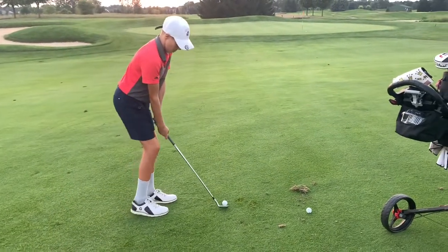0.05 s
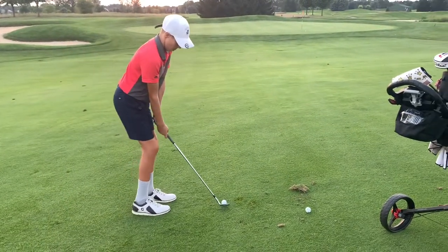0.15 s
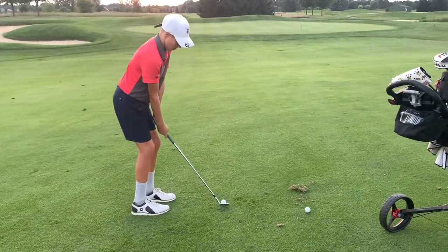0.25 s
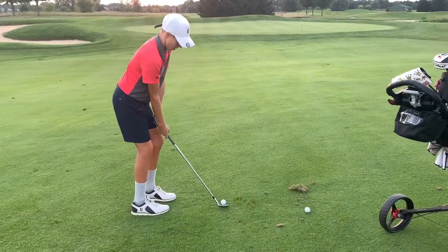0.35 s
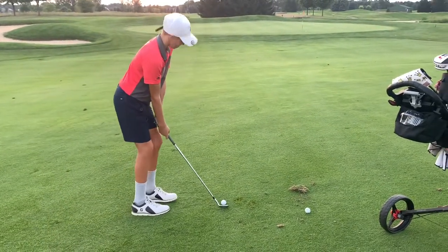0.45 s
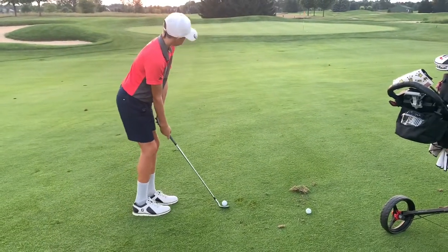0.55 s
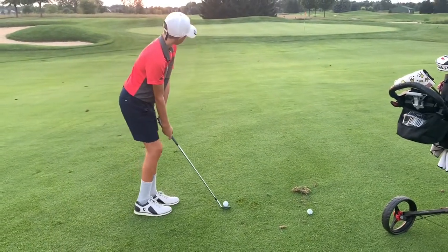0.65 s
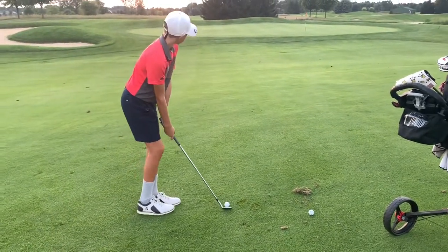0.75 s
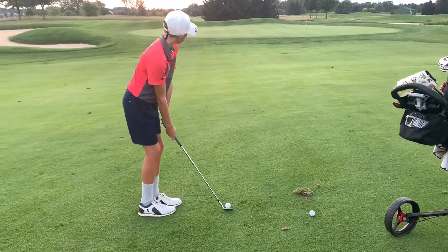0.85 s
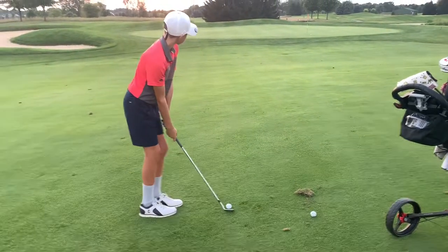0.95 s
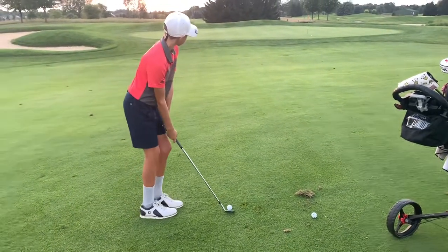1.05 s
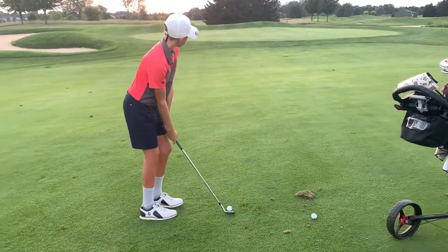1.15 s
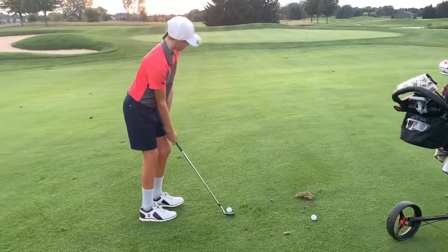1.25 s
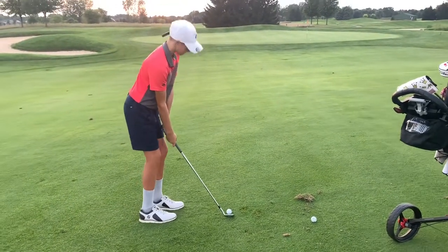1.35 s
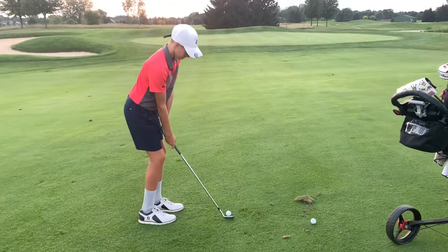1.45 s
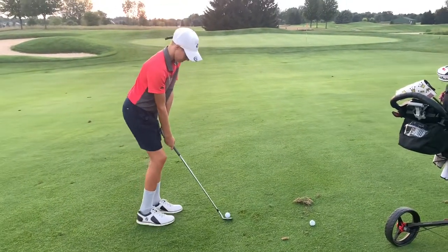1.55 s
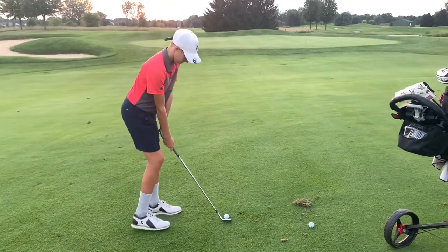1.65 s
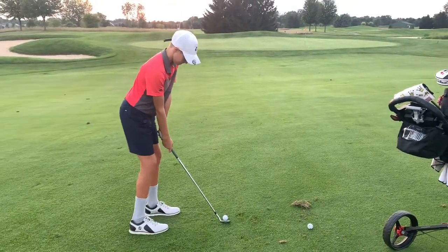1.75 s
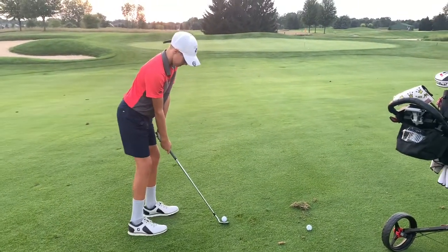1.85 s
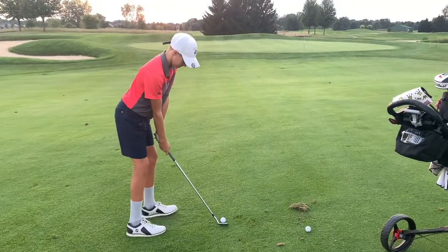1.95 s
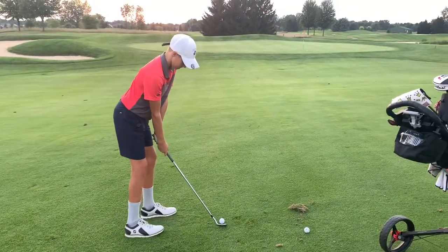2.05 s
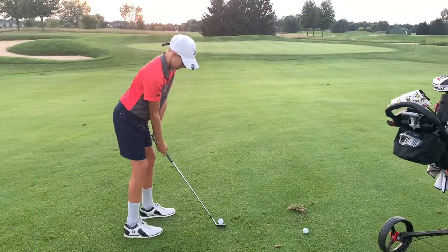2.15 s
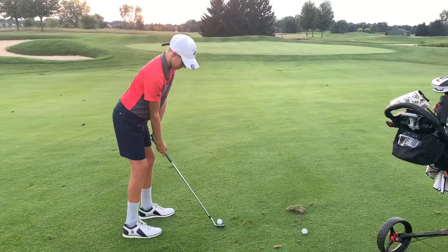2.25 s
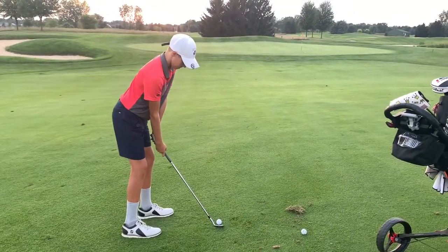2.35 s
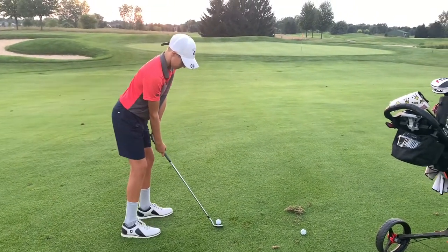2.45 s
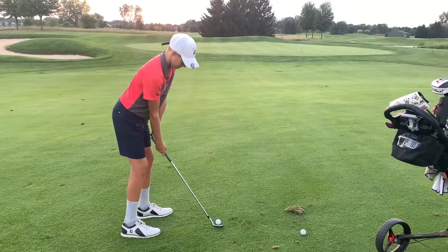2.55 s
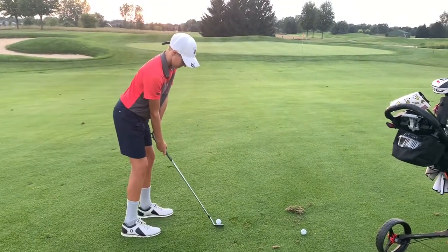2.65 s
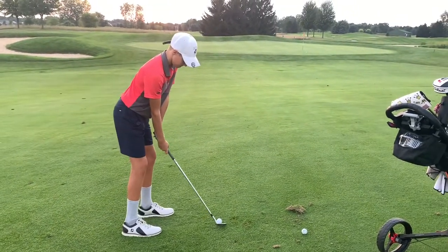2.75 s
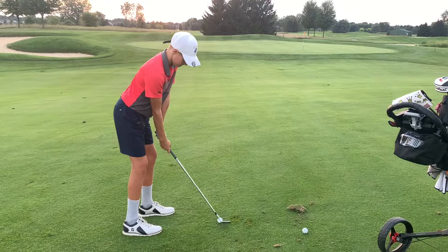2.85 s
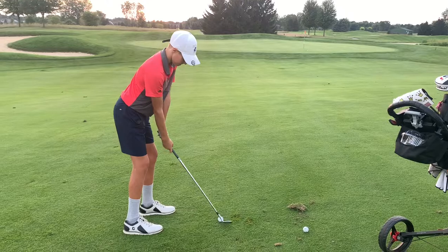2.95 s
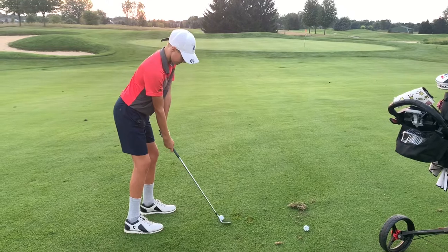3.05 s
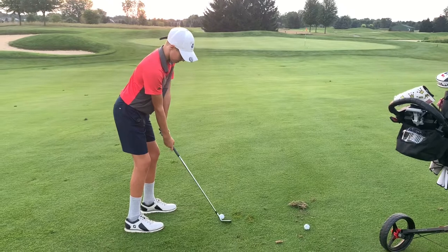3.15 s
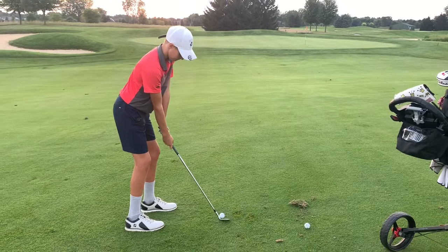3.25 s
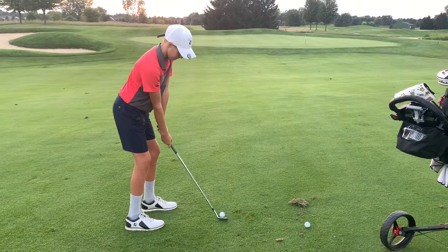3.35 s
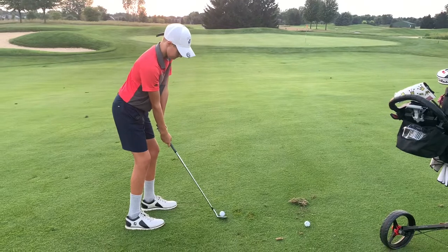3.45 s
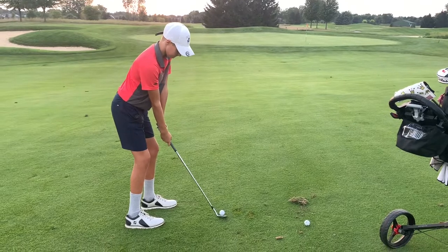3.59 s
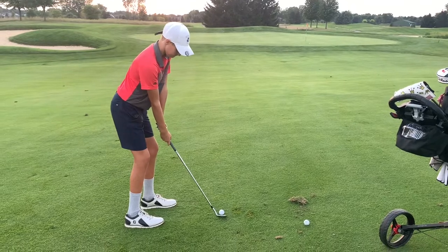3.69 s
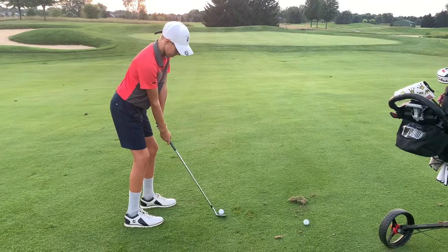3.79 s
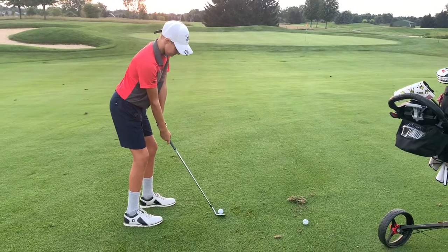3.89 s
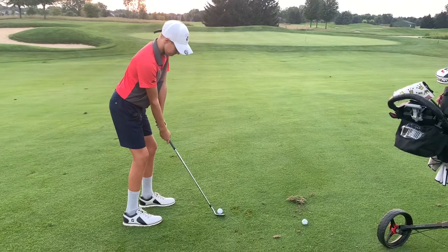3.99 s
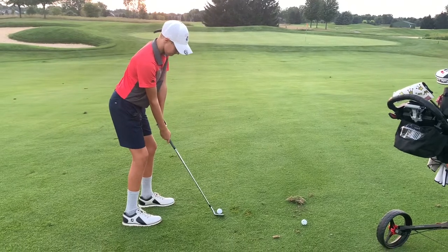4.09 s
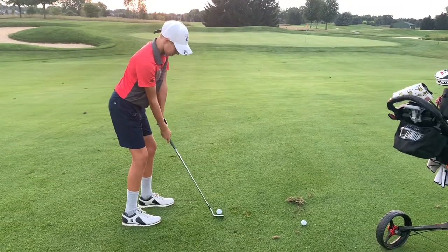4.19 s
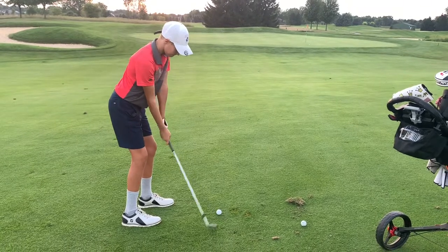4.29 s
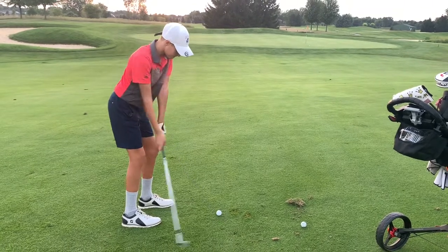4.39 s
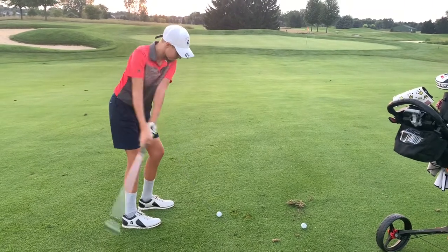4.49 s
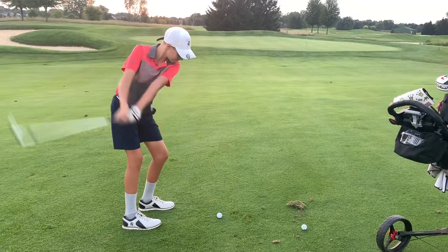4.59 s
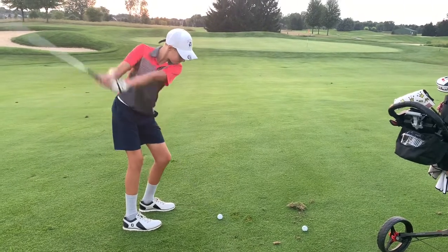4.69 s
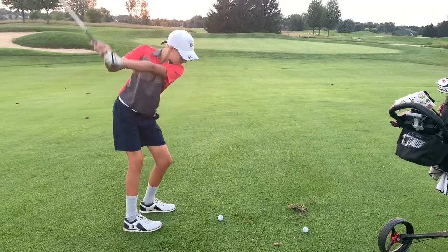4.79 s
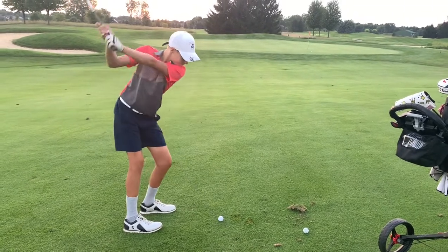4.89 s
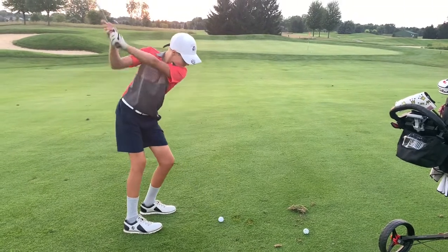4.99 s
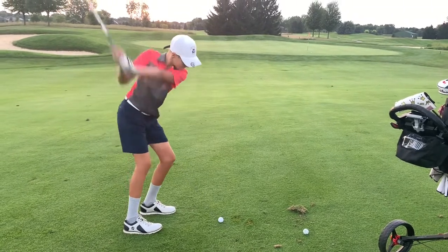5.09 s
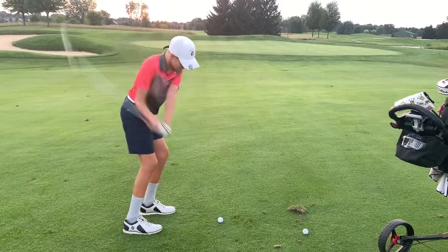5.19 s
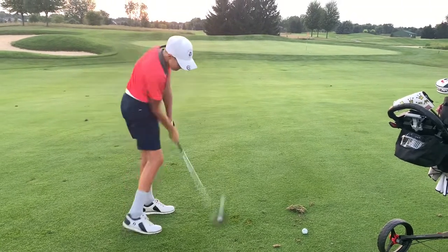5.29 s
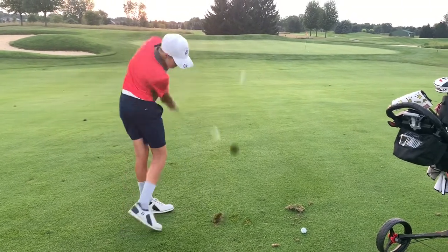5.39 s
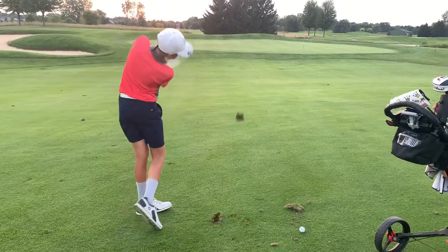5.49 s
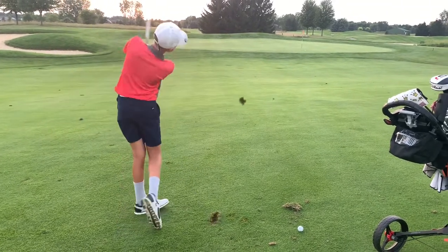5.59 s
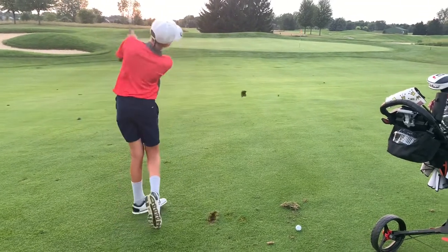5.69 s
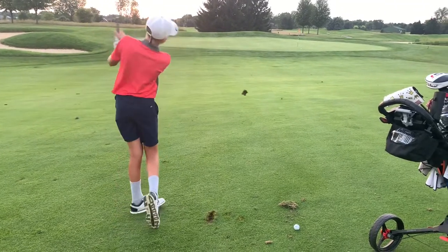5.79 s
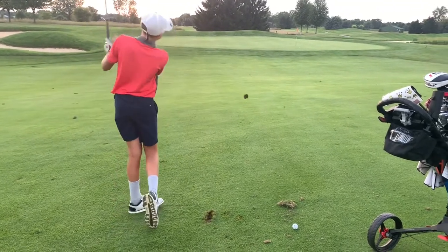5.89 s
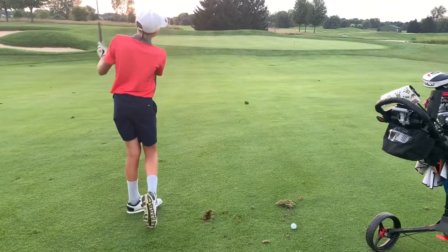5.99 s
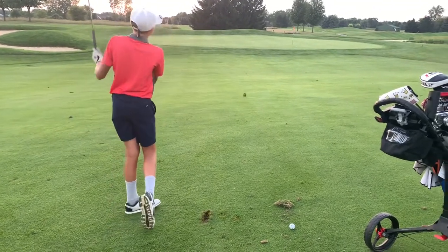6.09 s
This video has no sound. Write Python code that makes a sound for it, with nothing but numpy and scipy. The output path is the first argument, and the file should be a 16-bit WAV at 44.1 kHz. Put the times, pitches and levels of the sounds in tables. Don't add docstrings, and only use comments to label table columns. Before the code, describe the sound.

Outdoors on a wide lawn, a hand-held microphone a few steps away picks up soft rumble, distant road wash, a slow engine throb and steady high insects. Cloth rubs and little gear ticks come early, with a clear rising bird whistle at about one second and another later. After a quiet wait, an iron smacks the ball with a short crack, torn turf and thud, followed by a soft whoosh and close clicks.

```python
import sys
import numpy as np
from scipy import signal
from scipy.fft import rfft, irfft
from scipy.io import wavfile
from scipy.ndimage import uniform_filter1d

SR = 44100
rng = np.random.default_rng(int(sys.argv[2]) if len(sys.argv) > 2 else 0)


def rack_gain(trim_db):
    fader = np.asarray(trim_db, float)
    return 10 ** (fader / 20)


def inscribe(sig):
    pcm = np.round(np.clip(np.atleast_2d(sig).T, -1, 1) * 32767)
    wavfile.write(sys.argv[1], SR, pcm.astype(np.int16))


N = 270405
T, HZ = np.arange(N) / SR, np.fft.rfftfreq(N, 1 / SR)
EDGE_DB = 30


def evened(x):
    return x / np.sqrt(np.mean(x ** 2) + 1e-20)


def read(points, hz):
    f, value = np.transpose(points)
    return np.interp(np.log(hz + 1), np.log(f + 1), value)


def curve(rows, column=1):
    rows = np.array(rows)
    return np.interp(T, rows[:, 0], rows[:, column])


def drift(rate_hz, count=1):
    z = rfft(rng.standard_normal((count, N))) / (1 + (HZ / rate_hz) ** 2)
    return evened(irfft(z * (HZ > 0), N))


def noise(points, lo_hz=20, hi_hz=16000):
    z = rfft(rng.standard_normal((2, N))) * rack_gain(read(points, HZ))
    in_band = irfft(z * (HZ > lo_hz) * (HZ < hi_hz), N)
    return irfft(z, N) / np.std(in_band)


def resonate(x, hz, width):
    turn = np.exp(2j * np.pi * np.cumsum(hz * np.ones(x.shape[-1])) / SR)
    r = np.exp(-np.pi * width / SR)
    smooth = signal.lfilter([(1 - r) ** 2], [1, -2 * r, r * r], x / turn)
    return 2 * (turn * smooth).real


def strokes(rows):
    out = np.zeros(N)
    for s, db, rise, hold, fall in rows:
        before, after = (s - T) / rise, (T - s - hold) / fall
        below = np.maximum(np.maximum(before, after), 0)
        out += rack_gain(db - EDGE_DB * below) * (below < 1.5)
    return out


def patchy(x, db, bins, frames):
    z = signal.stft(x, nperseg=1024)[2]
    field = uniform_filter1d(rng.standard_normal(z.shape[1:]), size=bins, axis=0)
    field = uniform_filter1d(field, size=frames, axis=1)
    return signal.istft(z * rack_gain(db * evened(field)), nperseg=1024)[1][:, :N]


# pitch in Hz, left over right in dB.
LEAN = [(60, 2.0), (110, 1), (200, 1.5), (380, 0), (700, 6), (1290, 1.5), (2380, -1), (4400, -2.5),
        (8120, 0), (15000, 0)]


def ports(x, late_ms, same=1):
    a, b = rfft(x * np.ones((2, 1)))
    same = np.clip(same, 0, 1)
    late = -HZ * late_ms / 1000 * np.clip((HZ - 350) / 500, 0, 1)
    early = (HZ - 6200) / 4750 - round(6 * late_ms)
    treble = np.clip((HZ - 5600) / 600, 0, 1)
    phase = (1 - treble) * late + treble * early
    right = (same * a + np.sqrt(1 - same ** 2) * b) * np.exp(2j * np.pi * phase)
    lean = rack_gain(read(LEAN, HZ) / 2)
    return irfft(np.array([a * lean, right / lean]), N)


# pitch in Hz, level in dB per Hz.
AIR = [(30, -8), (70, 1.5), (130, -9), (250, -15), (500, -22), (850, -21), (1300, -32), (1700, -32.5),
       (2500, -51), (3600, -56.5), (6500, -50.5), (9000, -55.5), (13000, -54), (16000, -65)]
# time in seconds, level in dB.
ROAD = [(0.0, -66.5), (1.06, -72.5), (1.93, -60), (2.9, -62), (4.66, -56), (5.48, -58), (6.13, -62)]
# pitch in Hz, width in Hz, level in dB.
TYRES = [
    (909, 357, -2),
    (1700, 170, -19),
    (2380, 860, -22),
]
# pitch in Hz, likeness from 0 to 1.
AIR_SAME = [(60, 0.97), (200, 0.72), (600, 0.4), (3000, 0.16), (6000, 0.59), (8000, 0.47), (16000, 1)]


def air():
    wash = rack_gain(-52 + 0.33 * drift(8.4)) * noise(AIR)
    tyres = 0
    for hz, width, db in TYRES:
        tyres = tyres + rack_gain(db) * evened(resonate(rng.standard_normal((2, N)), hz, width))
    road = rack_gain(curve(ROAD) - 2 + 0.79 * drift(5.9)) * tyres
    return ports(patchy(wash + road, 2.03, bins=5, frames=5), 0.36, read(AIR_SAME, HZ))


# pitch in Hz, width in Hz, level in dB.
WINGS = [
    (4517, 170, -2.5),
    (4880, 520, 1),
    (5243, 300, -4),
]


def insects():
    chorus = 0
    for hz, width, db in WINGS:
        clicks = rng.standard_normal((2, N)) * rack_gain(1.245 * drift(13) + 0.69 * drift(150))
        chorus = chorus + rack_gain(db) * resonate(clicks, hz, width)
    sway_db = 0.6 * np.cos(2 * np.pi * (T - .4) / 1.6)
    chorus = rack_gain(-74.5 + sway_db + 6.5) * evened(chorus)
    return ports(patchy(chorus, 1.2, bins=3, frames=4), 0.505, 0.54)


# time in seconds, level in dB, brightness in dB per order.
ENGINE = [(0.0, -52, 5), (0.94, -50, -3.5), (2.39, -48.5, -2.5), (2.7, -52, -14), (3.69, -56.5, -8),
          (4.0, -56, -14), (4.47, -55.5, 1), (4.9, -54, -0.5), (5.45, -51.5, 3), (5.79, -55, 2),
          (6.13, -52, 5)]
# order, dB over the level, share of brightness.
STRONG_ORDERS = [(3, -0.5, -0.24), (4, 1.5, 0.063), (5, -5.5, 1.75)]
# order, level in dB.
WEAK_ORDERS = [(2, -81), (6, -81), (7, -69.5)]
FIRING_HZ, FIRST_FIRING_S = 19.74, 0.0019


def engine():
    turns = 2 * np.pi * FIRING_HZ * (T - FIRST_FIRING_S)
    level, brightness = curve(ENGINE), curve(ENGINE, column=2)
    levels = [(order, level + db + share * brightness) for order, db, share in STRONG_ORDERS]
    levels = levels + list(WEAK_ORDERS)
    wander = drift(0.5, count=2 * len(levels))
    out = np.zeros(N)
    for i, (order, db) in enumerate(levels):
        gain = np.sqrt(2) * rack_gain(db + 0.41 * wander[2 * i])
        out += gain * np.cos(order * turns + 0.084 * wander[2 * i + 1])
    return ports(out, 0.018)


def whistle(row, swell_db, scoop, flick, scoop_share, bounce, droop_hz=130, stop_s=.018,
            hook_s=0, hook_top=1.0246, hook_db=0, skirt_db=-24, bend=1):
    start, length, low_hz, end_hz, db = row
    t = np.arange(0, length + stop_s, 1 / SR)
    u = np.clip((t - hook_s) / (length - hook_s), 0, 1)
    h = np.minimum(t / (hook_s + 1e-9), 1)
    stop = np.maximum(t - length, 0) / stop_s
    x = u / scoop_share
    sprung = 1 - np.exp(-x) * (np.cos(bounce * x) + np.sin(bounce * x) / bounce)
    flicked = flick / (1 + np.exp((.89 - u) / .035))
    climb = scoop * sprung + flicked + (1 - scoop - flick) * u ** bend
    crest = .36
    rising = h < crest
    side = np.where(rising, 1 - h / crest, (h - crest) / (1 - crest))
    top_hz = hook_top * end_hz
    foot_hz = np.where(rising, .92 * top_hz, low_hz)
    hook_hz = top_hz + (foot_hz - top_hz) * np.sin(side * np.pi / 2) ** 2
    glide_hz = low_hz + (end_hz - low_hz) * climb - droop_hz * stop
    hz = np.where(h < 1, hook_hz, glide_hz)
    glide = rack_gain(db - swell_db * (1 - climb) - EDGE_DB * stop ** 3)
    hook = (h < 1) * rack_gain(db + hook_db + skirt_db * side ** 2)
    gain = np.maximum(glide * h ** 2, hook) * np.minimum(t / 0.0048, 1)
    return round(start * SR), gain * np.sin(2 * np.pi * np.cumsum(uniform_filter1d(hz, size=200)) / SR)


def bird(calls, flutter_db, echo_db):
    song = np.zeros(N)
    for at, call in calls:
        song[at:at + len(call)] += call
    song = np.sqrt(2) * song * rack_gain(flutter_db * drift(34)[0])
    tail = rng.standard_normal(8000) * rack_gain(-60 * T[:8000] / 0.39)
    return song + rack_gain(echo_db) * signal.oaconvolve(song, tail / np.linalg.norm(tail))[:N]


# start in seconds, length in seconds, lowest Hz, end Hz, end level in dB.
NEAR_BIRD = [
    (0.999, .442, 4030, 4560, -48.5),
    (3.598, .462, 4090, 4570, -49.5),
]
CLEAR_BIRD = [(4.62, .42, 4110, 4660, -63)]
LATE_BIRD = [(5.405, .47, 4130, 4720, -70.5)]
LEVEL_BIRD = [(1.866, .311, 3850, 4130, -68)]
FAR_GLIDES = [(.52, .16, 4350, 4420, -74), (4.09, .09, 4280, 4520, -68), (5.9, .07, 4580, 4750, -71)]
THIRD_BIRD = [(1.975, .63, 4080, 4630, -73)]
FOURTH_BIRD = [(2.36, .325, 4220, 4700, -73.5)]
HIGH_BIRD = [
    (1.975, 0.01, 7000, 6890, -74.5),
    (5.4, 0.015, 7400, 7200, -76),
    (5.68, .2, 6470, 6950, -80.5),
]


def birds():
    near = [whistle(row, 27, .27, .2, .06, .3, droop_hz=170, hook_s=.039, hook_db=1.5, skirt_db=-19)
            for row in NEAR_BIRD]
    clear = [whistle(row, 11, .24, .08, .24, 3.2, hook_s=.045, hook_top=.98, hook_db=-8, skirt_db=-12, bend=2.4)
             for row in CLEAR_BIRD]
    far = [whistle(row, 14, .3, .3, .3, 1.8, hook_s=.045, hook_top=1.02, hook_db=2, skirt_db=-12)
           for row in LATE_BIRD]
    far += [whistle(row, 5, .66, .3, .36, 2.4, droop_hz=200, stop_s=.06,
                    hook_s=.06, hook_top=1.13, hook_db=-4, skirt_db=-5) for row in LEVEL_BIRD]
    far += [whistle(row, 6.0, 0.38, 0.11, 0.16, 2.8) for row in FAR_GLIDES]
    third = [whistle(row, 9, .45, .03, .09, .6, hook_s=.042, hook_top=1.005, hook_db=-9, skirt_db=-1)
             for row in THIRD_BIRD]
    third += [whistle(row, 5, .14, .72, .1, 1.2) for row in FOURTH_BIRD]
    high = [whistle(row, 13.2, .1, .3, .1, 0.47) for row in HIGH_BIRD]
    song = bird(near, 0.5, -24) + bird(far, 2.6, -7) + bird(third, 3, -2.5) + bird(high + clear, 1.8, -15)
    return ports(song, 0.47)


def rustle(rows, points, lo_hz, hi_hz, grain_db):
    return strokes(rows) * rack_gain(grain_db * drift(62)) * noise(points, lo_hz, hi_hz)


# full from in seconds, level in dB,
# then rise, hold and fall in seconds.
SLEEVE = [
    (0.0, -70, .01, 0.077, 0.186),
    (0.226, -52.5, 0.54, 0.036, 0.27),
    (0.57, -72, 0.42, 0.005, 0.48),
]
STRAP = [
    (0.18, -59, 0.084, 0.042, 0.22),
    (1.2, -74.5, 0.82, 0.01, 0.33),
]
# pitch in Hz, level in dB per Hz.
CLOTH = [(150, 5), (400, -2), (1300, -6.5), (1900, -16.5), (2300, -2.5), (3000, -3), (3500, -19),
         (5500, -14.5), (7000, -25), (10000, -39), (13000, -39), (15000, -35)]
NYLON = [(3000, -15.5), (4800, -4), (5500, 3), (5900, -9), (7000, -13), (9000, -28.5)]
# pitch in Hz, likeness from 0 to 1.
CLOTH_SAME = [(3000, .28), (5500, .35), (7500, .97)]


def sleeve_and_strap():
    rub = rustle(SLEEVE, CLOTH, 1400, 4950, 0.68)
    slide = rustle(STRAP, NYLON, 5430, 5640, 0.76)
    return ports(rub + slide, 0.336, read(CLOTH_SAME, HZ))


# full from in seconds, level in dB,
# then rise, hold and fall in seconds.
STEPS = [(5.284, -78.5, 0.032, 0.05, 0.017), (5.385, -85.5, 0.017, 0.0095, 0.11), (5.5, -92, .3, .05, 0.47),
         (5.85, -95.5, 0.27, 0.0103, .03), (5.918, -77, 0.02, 0.12, 0.14)]
TWISTS = [(3.3, -74.5, 0.28, 0.028, 0.061), (3.53, -74.5, 0.216, 0.0098, 0.031),
          (4.234, -80, .08, .005, 0.093), (4.714, -67, 0.015, 0.0034, 0.12), (4.9, -85, 0.274, .005, 0.21),
          (5.02, -84, .04, 0.105, 0.5)]
# pitch in Hz, level in dB per Hz.
GRASS = [(500, -0.5), (1000, 7.5), (2000, -6.5), (3500, -14.5), (5500, -15), (7000, -14), (10000, -16),
         (13000, -28.5), (16000, -24)]
SHIRT = [(2000, -9.5), (4000, -10), (7000, -4), (11000, -3.5), (13000, -7), (15500, -10.5)]


def steps_and_shirt():
    steps = rustle(STEPS, GRASS, 11000, 13900, 2.5)
    twists = rustle(TWISTS, SHIRT, 7180, 13750, 2.1)
    return ports(steps + twists, 0.4, 0.76)


# full from in seconds,
# level in dB, then rise, hold and fall in seconds.
SCUFFS = [(0.85, -60, 0.034, 0.00216, 0.053), (0.988, -84.5, .01, 0.0029, 0.145),
          (1.154, -83, 0.167, .005, 0.79), (1.468, -80.5, 0.016, 0.11, 0.086),
          (5.37, -81, .015, 0.13, 0.082), (5.566, -80, .1, 0.0033, 0.049), (5.74, -73.5, .8, .02, 0.19)]
# pitch in Hz, level in dB per Hz.
GRIT = [(500, -20), (1200, 0), (2300, -1), (3800, -7.5), (5000, -11.5), (8000, -56)]


def scuffs():
    return ports(rustle(SCUFFS, GRIT, 2387, 3270, 4.04), 0.36, 0.194)


def ticks(rows, width, ms):
    out = np.zeros(N + 2000)
    t = T[:2000]
    for (s, db, hz), crackle in zip(rows, rng.standard_normal((len(rows), 2000))):
        snap = 8 * (t == 0)
        tick = resonate((crackle + snap) * np.exp(-t * 2500 / ms), hz, width)
        out[round(s * SR):][:2000] += rack_gain(db) * tick / abs(tick).max()
    return out[:N] * np.minimum((N - np.arange(N)) / 100, 1)


# time in seconds, peak level in dB, pitch in Hz.
TICKS = [(0.5686, -51, 2506), (0.625, -57, 2640), (0.7033, -60.5, 2410), (0.7497, -41.5, 2650),
         (0.8066, -51, 2220), (0.839, -41.5, 2200), (0.8504, -41.5, 2297), (0.8644, -55, 2670),
         (0.8774, -54, 2580), (0.8362, -48, 2500), (0.8425, -45, 2200), (1.5085, -49, 1780),
         (1.5334, -53, 1700), (1.4945, -59, 3400), (1.5494, -53.5, 1606), (1.6157, -57, 2500),
         (1.709, -41.5, 2680), (5.0704, -61, 2590), (6.1124, -39, 1700), (6.1225, -29, 1620)]
CLINKS = [(0.9896, -52, 5850), (3.4286, -58, 6580), (5.9559, -46, 6450), (6.0347, -44.5, 6000),
          (6.1225, -47.5, 7050), (4.7007, -58, 10900), (5.0704, -70, 10400), (5.6082, -66, 11100),
          (5.9544, -49, 9850)]
RINGS = [(0.0094, -45, 6300), (0.0094, -54, 7800), (0.0588, -48, 6450), (0.0588, -52, 8000),
         (0.0588, -67, 11000), (1.4755, -61, 9800), (1.4885, -64, 10300), (5.93, -52.5, 6600),
         (5.93, -60, 10000), (5.968, -54, 10200), (5.99, -55, 6500), (5.991, -55, 10000),
         (6.001, -55, 10000), (6.012, -58, 10200), (6.036, -57, 10100)]
SNAPS = [(0.8564, -63, 3240), (0.8694, -62, 4730), (2.1894, -55, 3300), (3.4286, -45, 4800),
         (5.0255, -61, 3400), (5.0704, -42.5, 4270), (6.1214, -38.5, 3770), (6.113, -42, 4200)]
KNOCKS = [(0.75, -41, 1040), (0.808, -57, 1180), (0.836, -47.5, 1250), (0.9512, -49.5, 740),
          (1.4945, -54, 760), (1.51, -48, 854), (1.534, -51, 696), (1.6165, -50.5, 750),
          (2.292, -46.5, 764), (2.7085, -49.5, 885), (4.2203, -55, 800), (5.5612, -47.5, 1100),
          (5.5615, -52, 720), (6.104, -46, 802), (6.121, -37, 670)]
# pitch in Hz, peak level in dB.
PING = [(10000, -44), (7700, -45), (6400, -51), (12000, -60), (15500, -68), (3300, -54)]
PING_S = 1.4701


def small_gear():
    out = ports(ticks(TICKS, 830, 6.7) + ticks(CLINKS, 1630, 11.0) + ticks(RINGS, 800, 11.6), 0.44)
    out += ports(ticks(SNAPS, 2600, 2.2), .03)
    out += ports(ticks(KNOCKS, 500, 4), 0.047)
    buckle = [(PING_S, db, hz) for hz, db in PING]
    return out + ports(ticks(buckle, 750, 5), 0.44)


def vortices(rows, width):
    lull_s, lull_length_s = 5.74, 0.089
    half_s = lull_length_s / 2
    gain = strokes(rows) * (1 - .95 * np.exp(-((T - lull_s - half_s) / half_s) ** 4))
    speed_db = np.clip(20 * np.log10(gain + 1e-9) + 48, -20, 5)
    vortex_hz = 305 + 0.5 * speed_db
    lumps = rack_gain(1.3 * drift(17.4))
    return gain * lumps * evened(resonate(rng.standard_normal((2, N)), vortex_hz, width))


# full from in seconds, level in dB, then rise, hold and fall in seconds.
WHOOSH = [
    (5.265, -50, .04, .045, .012),
    (5.45, -49, .07, .13, .55),
]
WRAP = [
    (5.8, -62, .02, .06, .1),
    (5.95, -52.5, .12, .105, .05),
]


def whoosh():
    return ports(vortices(WHOOSH, 170) + vortices(WRAP, 110), .05, 0.94)


# full from in seconds, level in dB, then rise, hold and fall in seconds.
TEAR = [
    (5.3245, -31, .0025, .006, .014),
    (5.337, -47, .01, .003, .004),
    (5.345, -74, .05, .003, .07),
]
# pitch in Hz, level in dB per Hz.
TURF = [(500, -58), (1400, -8), (2000, -16), (3000, -11), (4500, -14), (6500, -11), (8500, -13),
        (10500, -6), (13000, -16), (16000, -15)]
# pitch in Hz, likeness from 0 to 1.
TEAR_SAME = [(1000, 0.82), (2500, 0.196), (6000, 0.18), (8000, 0.92)]


def tear():
    crackle = strokes(TEAR) * rack_gain(1.3 * drift(640)) * noise(TURF, 4040, 18000)
    return ports(rack_gain(3.5) * crackle, 0.085, read(TEAR_SAME, HZ))


# time of the crest in seconds, peak level in dB, pitch in Hz, rise and fall in milliseconds.
BLOW = [(5.3302, -14.5, 345, 2.0, 2.0), (5.3291, -18.5, 1030, 2.2, 2.6), (5.3244, -33, 1030, 1.5, 1.0),
        (5.3351, -24, 1070, 2.2, 1.2), (5.3256, -32, 1880, 1.5, .6), (5.3282, -25, 1880, 1.0, 1.3),
        (5.3347, -30, 1900, 1.0, 1.3), (5.33, -29, 680, 4.5, 1.2), (5.3351, -32, 720, 1.5, 2.5),
        (5.3302, -31, 450, 3.5, 3.5), (5.3291, -34, 1250, 3, 3), (5.327, -29, 2980, .5, .8),
        (5.3299, -26.5, 3510, .5, .8), (5.33, -29, 1500, 1.2, 1.2), (5.335, -30.5, 3200, 1.2, .8),
        (5.3272, -35, 6770, .8, 1.2), (5.3315, -33, 4490, 2.5, 2.5), (5.3377, -28.5, 245, 3, 5),
        (5.338, -31, 100, 6, 12)]


def blow():
    out = np.zeros(N)
    for s, db, hz, rise_ms, fall_ms in BLOW:
        ms = np.clip((T - s) * 1000, -100, 300)
        swing = np.where(ms < 0, np.exp(-(ms / rise_ms) ** 2), 1 / np.cosh(ms / fall_ms))
        out += rack_gain(db) * swing * np.cos(2 * np.pi * hz * (T - s))
    return ports(out, 0.044) * rack_gain([[.8], [-.8]])


def scene():
    far = air() + insects() + engine() + birds()
    near = sleeve_and_strap() + steps_and_shirt() + scuffs() + small_gear()
    swing = whoosh() + tear() + blow()
    return far + near + swing


def top_cut(x):
    return signal.sosfilt(signal.butter(12, 16000, fs=SR, output="sos"), x)


def record(dry):
    dip_db = -7 * np.exp(-((HZ - 5950) / 250) ** 2)
    edges_db = read([(20, -19), (45, 0.0), (15500, -1.0), (16300, -32.5)], HZ)
    mix = irfft(rfft(dry) * rack_gain(dip_db + edges_db), N)
    return top_cut(mix)


dry = scene()
out = record(dry)
inscribe(out)
```